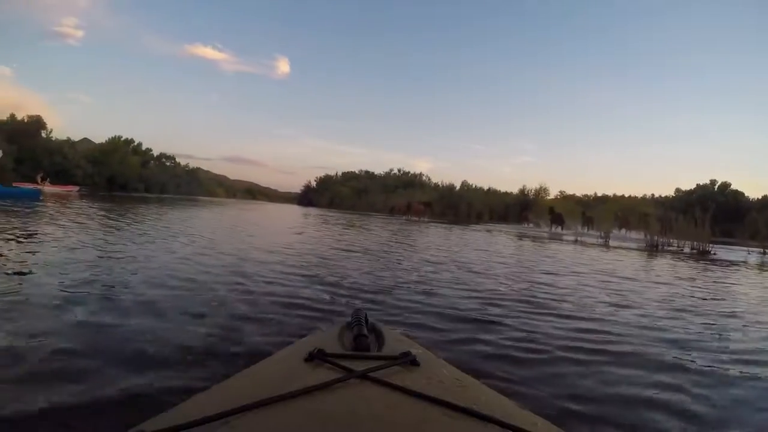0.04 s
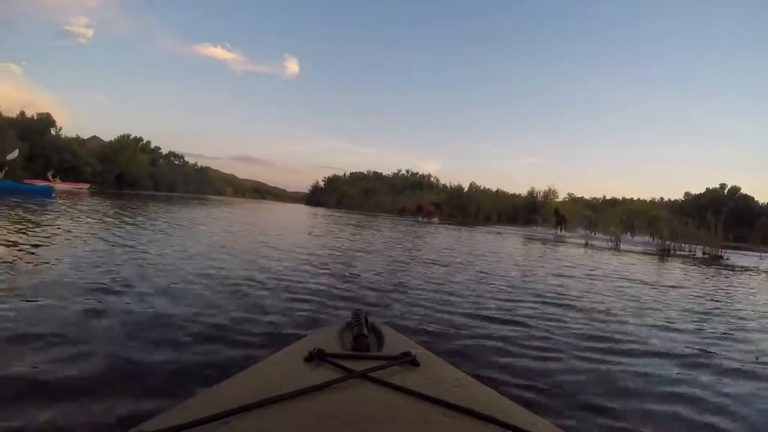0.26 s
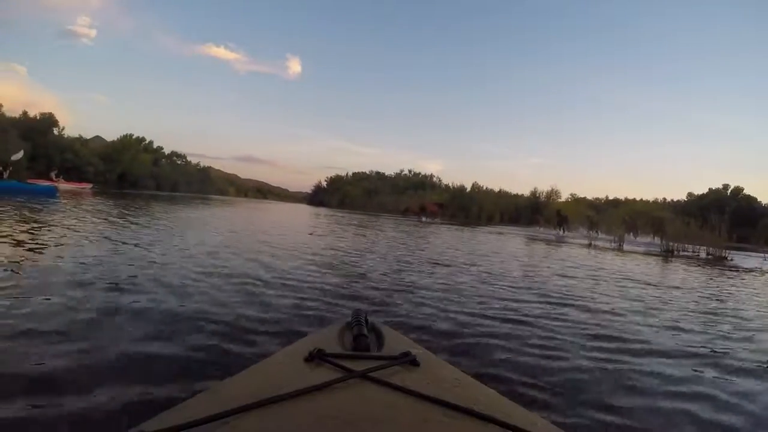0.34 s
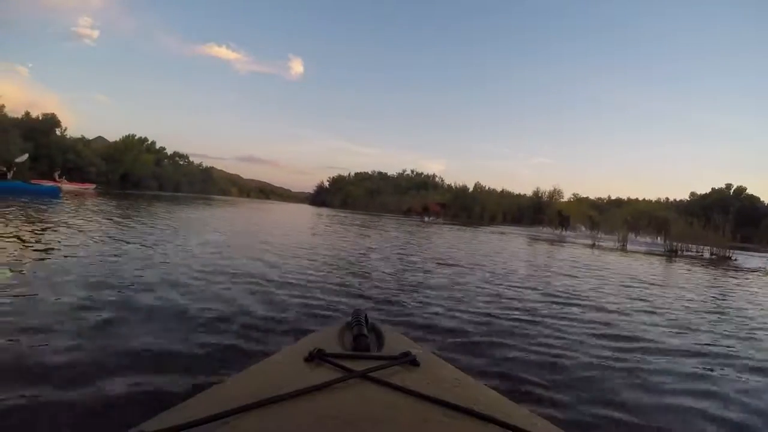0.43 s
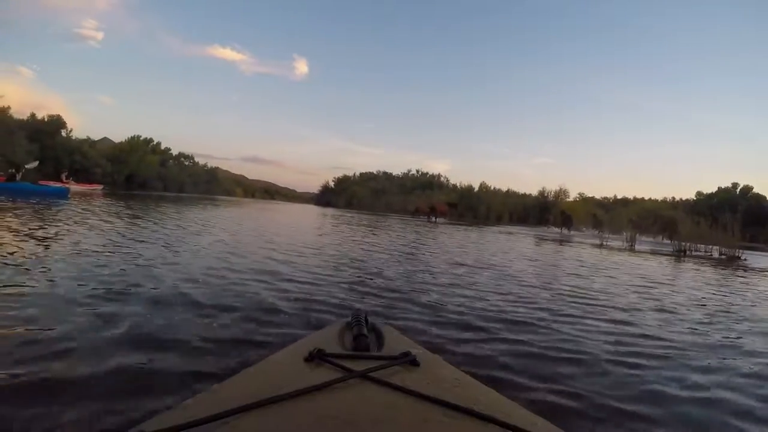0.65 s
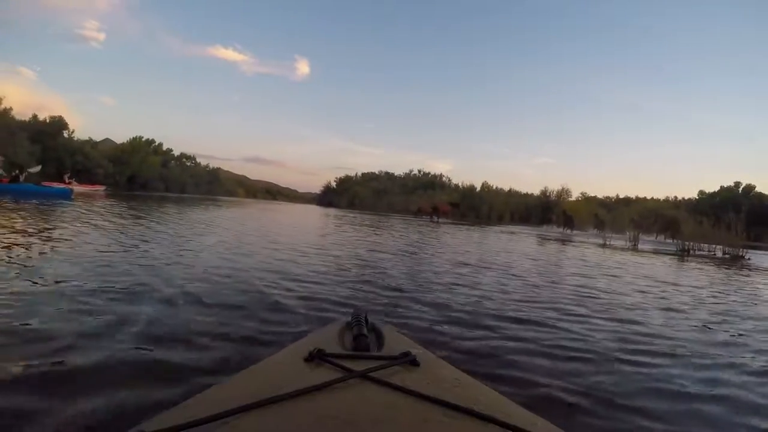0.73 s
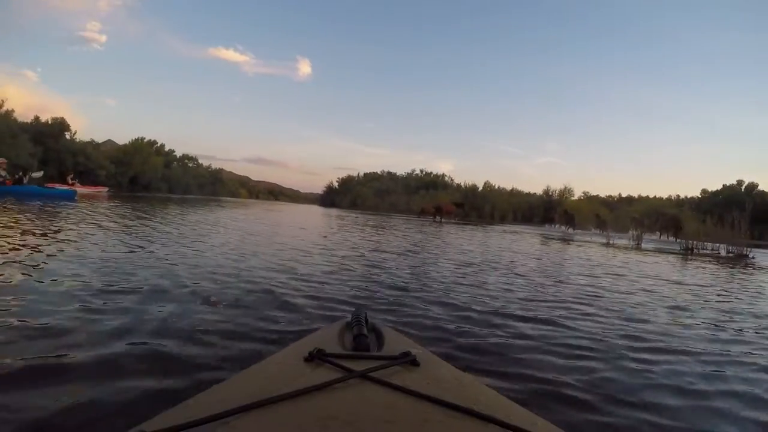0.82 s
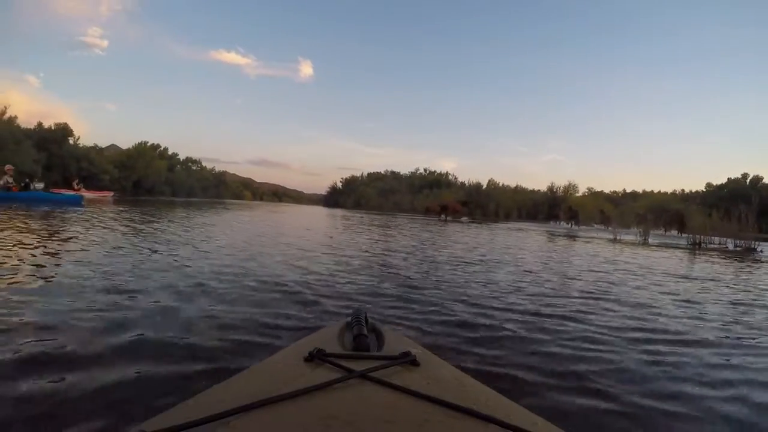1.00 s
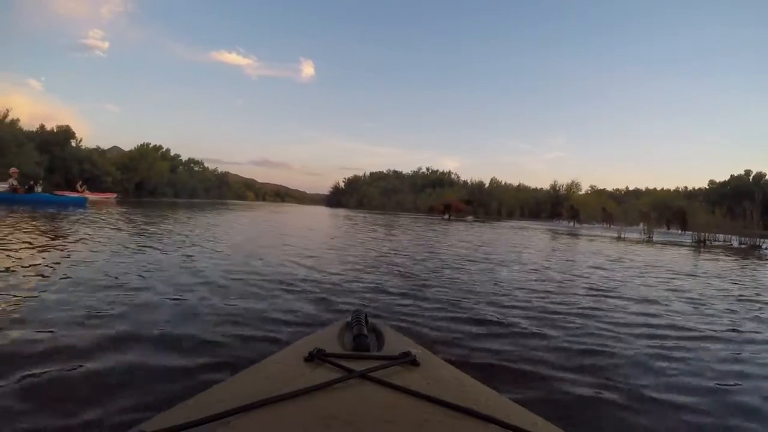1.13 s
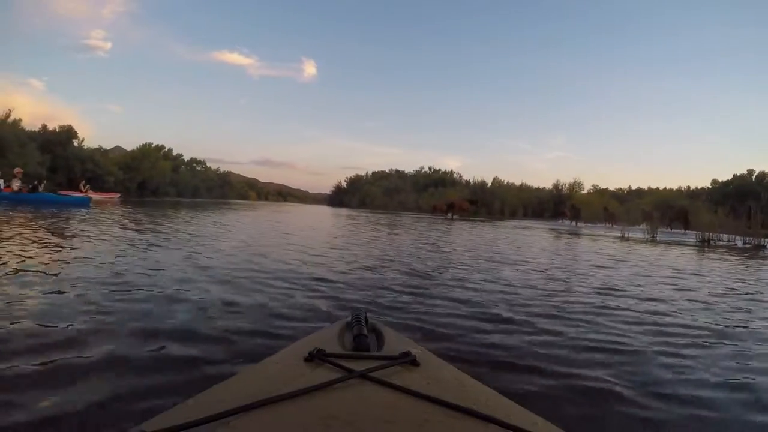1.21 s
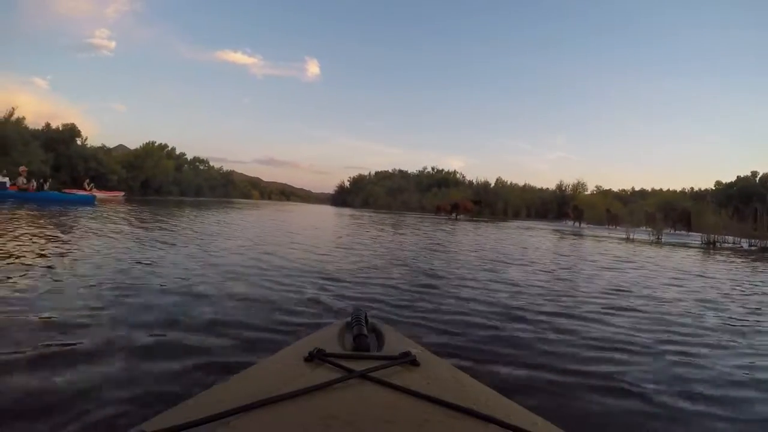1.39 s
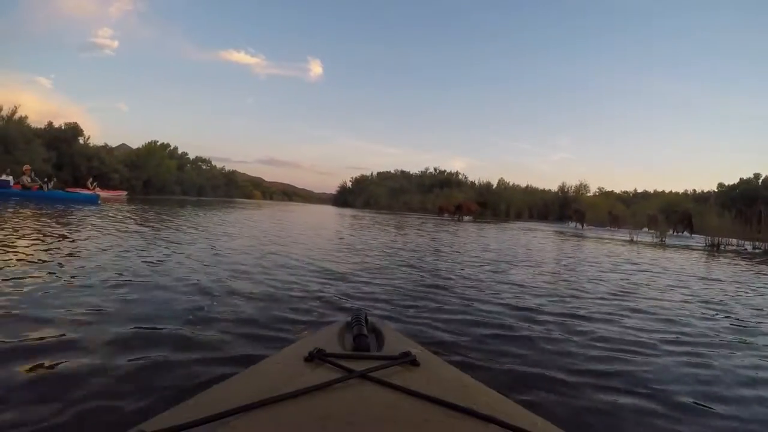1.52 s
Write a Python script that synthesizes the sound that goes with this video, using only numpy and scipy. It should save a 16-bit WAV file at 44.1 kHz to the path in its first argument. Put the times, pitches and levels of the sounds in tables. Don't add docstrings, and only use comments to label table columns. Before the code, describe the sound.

Hollow knocks on a plastic kayak hull, close and dry, over faint lapping water on a lake

```python
import sys
import numpy as np
from scipy import signal
from scipy.fft import rfft, irfft
from scipy.io import wavfile

SR = 44100
rng = np.random.default_rng(int(sys.argv[2]) if len(sys.argv) > 2 else 0)


def transcribe(u):
    v = np.clip(np.atleast_2d(u).T, -1, 1)
    q = np.round(v * 32767).astype(np.int16)
    wavfile.write(sys.argv[1], SR, q)


def voltage_ratio(level):
    return 10 ** (np.asarray(level, float) / 20)


N = 68355


def evened(x):
    return x / np.sqrt(np.mean(x ** 2) + 1e-20)


def read(points, hz):
    f, level_db = np.transpose(points)
    return np.interp(np.log(hz + 1), np.log(f + 1), level_db)


def curve(points):
    return voltage_ratio(np.interp(np.arange(N) / SR, *np.transpose(points)))


def add(mix, start, sound):
    part = mix[round(start * SR):][:len(sound)]
    part += sound[:len(part)]


def coloured(db_of, size):
    hz = np.fft.rfftfreq(size, 1 / SR)
    spectrum = rfft(rng.standard_normal(size)) * voltage_ratio(db_of(hz))
    return evened(irfft(spectrum, size))


def ring(hz, t60, t):
    return voltage_ratio(-60 * t / t60) * np.sin(2 * np.pi * hz * t)


def pushed(x, push_s):
    blow = np.hanning(round(push_s * SR) + 3)
    return signal.oaconvolve(x, blow / blow.sum())[:len(x)]


def lowpass(hz, corner_hz, slope_db):
    return -slope_db * np.log2(1 + (hz / corner_hz) ** 4) / 4


# f/Hz, level/dB per Hz
AIR_SPECTRUM = [(250, 0), (800, 0), (1600, -6), (2500, -6.5), (4500, -10.5), (6300, -13.5), (10800, -16),
                (12500, -22.5)]
# t/s, gain/dB
AIR_GAIN = [(0, 6), (.3, 6), (.5, 5), (.62, 6), (.9, 4.5), (1.55, 3)]
# f/Hz, width/Hz, level/dB
HOUSING_HUMPS = [(1260, 220, 5), (1740, 200, 8), (3335, 270, 5.5), (3853, 243, 7), (7150, 370, 6.5),
                 (9600, 900, 5)]


def air():
    def spectrum(f):
        humps = sum(db * np.exp(-((f - hz) / width) ** 2) for hz, width, db in HOUSING_HUMPS)
        return read(AIR_SPECTRUM, f) + humps + lowpass(200 / (f + 1), 0.61, 8.7)

    return voltage_ratio(-84.5) * curve(AIR_GAIN) * coloured(spectrum, N)


# f/Hz, level/dB per Hz
LAP_SPECTRUM = [(15, 1.5), (33, 4.5), (60, -4.5), (100, -4.5), (200, -17.5), (300, -36), (600, -44),
                (3000, -110)]
# t/s, gain/dB
LAP_GAIN = [(0, -14), (.19, -8.5), (.25, 9.5), (.6, 8), (.95, 4.5), (1.3, 2.5), (1.55, -7.5)]


def lapping():
    lumps = coloured(lambda f: lowpass(f, 12, 24), N)
    water = coloured(lambda f: read(LAP_SPECTRUM, f) + lowpass(12 / (f + 1), 1, 12), N)
    return voltage_ratio(-63) * voltage_ratio(3 * lumps) * curve(LAP_GAIN) * water


# f/Hz, level/dB
WHINE_TONES = [(5033, -97), (5572, -106), (7241, -105)]


def whine():
    t = np.arange(N) / SR
    return sum(voltage_ratio(db) * np.sin(2 * np.pi * hz * t) for hz, db in WHINE_TONES)


# t/s, level/dB, f/Hz, t60/s
TAP_NOTES = [
    (.040, -69, 760, .06),
    (.043, -70, 900, .05),
    (.872, -73, 1260, .042),
    (.942, -68, 1330, .04),
    (1.233, -63, 960, .036),
    (1.446, -59, 940, .035),
    (1.446, -62, 760, .035),
    (1.447, -69, 1280, .025),
    (1.448, -72, 2500, .02),
    (1.054, -56, 945, .06),
]


def tap(start, db, hz, t60):
    t = np.arange(4096) / SR
    note = ring(hz, t60, t) + .3 * ring(.93 * hz, t60, t)
    return start, voltage_ratio(db) * np.minimum(t / .003, 1) * note


# t/s, then bend, flex, side and drum level/dB
THUD_BLOWS = [(0.082, -78, -72.5, -68, -71), (.211, -68, -56, -51, -46), (0.229, -69, -41, -61, -78),
              (0.267, -64, -41, -69, -49), (0.297, -55, -51, -47, -55), (0.358, -64, -39.5, -46.5, -46),
              (.380, -42.5, -51, -61, -43.5), (0.442, -58, -63.5, -61.5, -76), (.540, -32, -32.5, -24, -32),
              (.572, -39, -41.5, -39, -32), (.616, -48, -38.5, -39, -34), (0.638, -41.5, -40, -28.5, -32.5),
              (.747, -46, -37.5, -33.5, -39.5), (.781, -50, -51, -65, -38), (.815, -53, -60.5, -67, -53),
              (0.888, -56.5, -67.5, -78, -68), (1.062, -51.5, -41, -37, -45.5),
              (1.164, -68.5, -69, -60, -85), (1.244, -55, -61.5, -74, -55.5), (1.356, -65, -78, -68, -60.5),
              (1.449, -51, -47.5, -49.5, -76), (1.487, -57, -65, -64, -82)]
# f/Hz, t60/s, partner f/Hz, partner level/dB, rise/s
HULL_MODES = [(62.6, 0.39, 76, -5.5, 0.0076), (96.45, 0.21, 108.2, -0.5, 0.0024),
              (149.7, 0.084, 170, -5, 0.0017), (184.85, 0.19, 311, -21, 0.0019)]


def thud(start, *levels_db):
    t = np.arange(22050) / SR
    modes = np.zeros(len(t))
    for db, (hz, t60, partner_hz, partner_db, rise_s) in zip(levels_db, HULL_MODES):
        pair = ring(hz, t60, t) + voltage_ratio(partner_db) * ring(partner_hz, 0.73 * t60, t)
        modes -= voltage_ratio(db) * (1 - 0.37 * np.exp(-t / rise_s)) * pair
    modes = signal.lfilter(*signal.butter(2, 49, "high", fs=SR), modes)
    wash = coloured(lambda f: lowpass(f, 248, 60) + lowpass(55 / (f + 1), 0.55, 54), len(t))
    wash *= voltage_ratio(levels_db[1] - 13 - 60 * t / .2) * np.minimum(t / .01, 1)
    push_s = .0065 if max(levels_db) < -45.5 else .0025
    return start, pushed(modes, push_s) + wash


# t/s, level/dB, f/Hz, t60/s
SKIN_SLAPS = [
    (1.4458, -41, 118, .05),
    (1.2505, -47, 140, .045),
    (1.350, -59, 190, .07),
    (1.361, -65, 270, .06),
    (1.325, -59, 160, .06),
    (.086, -58, 185, .13),
]


def slap(start, db, hz, t60):
    t = np.arange(8192) / SR
    return start, voltage_ratio(db) * pushed(ring(hz, t60, t), .7 / hz)


# t/s, level/dB
MOUNT_KICKS = [
    (0.087, -65.5),
    (0.268, -40),
    (0.549, -45.5),
    (0.671, -35.5),
    (0.782, -34.5),
    (0.951, -48.5),
    (1.072, -42),
    (1.331, -60.5),
    (1.487, -66),
]


def sway(start, db):
    t = np.arange(44100) / SR
    return start, voltage_ratio(db) * pushed(ring(30.95, 0.53, t), push_s=.02)


# t/s, level/dB, tilt/dB per octave, housing buzz/dB, favoured f/Hz
DECK_RAPS = [(.208, -55.5, -1, -12, 431.4), (.250, -59, 1, -29, 340), (.345, -58.5, 1, 9, 834),
             (.357, -61, 0, -12, 405), (.531, -35.5, 2, -1, 667), (.537, -37.5, -4, -3.5, 655),
             (.541, -36.5, -7, -23.5, 316.6), (0.543, -46, 1, 18, 1164), (.558, -47.5, 0.5, 13.5, 1033),
             (.568, -46, -2.5, 10.5, 1087), (.609, -40, -2.5, -5.5, 700), (0.617, -44, -4, -6.5, 470),
             (0.623, -41.5, -6, -0.5, 1035), (.638, -44, -4.5, -4, 325), (.644, -50.5, 0.5, -8.5, 662),
             (0.651, -50.5, -11, 1.5, 1000), (.738, -41, -0.5, -20, 994), (.744, -41, -6, 1.5, 687.5),
             (1.055, -65.5, -2.5, 0, 940), (1.060, -58.5, -14, -25, 287), (1.448, -72, 2.5, 4, 766)]
# f/Hz, level/dB, t60/s
DECK_MODES = [(312.5, -2.5, 0.085), (405, -14, 0.15), (449.7, -8, 0.13), (481.6, -10, 0.13),
              (558, -13, 0.077), (647.5, -5.5, 0.048), (691, -4, 0.099), (849, -0.5, 0.073),
              (1002, -2, 0.04), (1175, 1.5, 0.047), (1345, -4.5, 0.062), (1423, -8.5, 0.056),
              (1800, -20, .06), (2160, -32.5, .05)]
# f/Hz, level/dB per Hz
CRACK_SPECTRUM = [(250, -7), (700, -7.5), (1300, 0), (1900, -19), (3000, -21), (4200, -33), (9500, -45),
                  (12500, -72.5)]
# f/Hz, level/dB per Hz
RATTLE_SPECTRUM = [(150, -26), (300, -6), (700, 1), (1300, -8.5), (1800, -20.5), (3000, -23), (4500, -35.5),
                   (9000, -58)]


def rap(start, db, tilt_db, buzz_db, spot_hz):
    t = np.arange(8192) / SR

    def lean(f):
        near_spot = np.exp(-(np.log2((f + 1) / spot_hz) / .25) ** 2)
        return tilt_db * np.log2(f / 700 + 0.23) + 5 * near_spot

    modes = np.zeros(len(t))
    for hz, mode_db, t60 in DECK_MODES:
        scatter, detune, side = rng.standard_normal(3)
        level = voltage_ratio(mode_db + 2.5 * scatter + lean(hz)) * np.sign(side)
        modes += level * ring(hz * (1 + .012 * detune), t60, t) / 2
    crack = coloured(lambda f: read(CRACK_SPECTRUM, f) + lean(f), len(t))
    crack *= voltage_ratio(-2.5 - 60 * t / 0.016)
    rattle = coloured(lambda f: read(RATTLE_SPECTRUM, f) + lean(f), len(t))
    rattle *= voltage_ratio(-7 - 60 * t / 0.086)
    buzz_hz = 2493
    buzz = ring(buzz_hz, 0.031, t) + 0.77 * ring(1.035 * buzz_hz, 0.013, t)
    buzz *= voltage_ratio(-12.5 + buzz_db) * np.minimum(t / 0.0028, 1)
    spot = ring(spot_hz, .07, t)
    rise_s = .02 if start < .3 else .001
    return start, voltage_ratio(db) * np.minimum(t / rise_s, 1) * (modes + spot + crack + rattle + buzz)


# t/s, level/dB, f/Hz, t60/s
PANEL_RINGS = [(.357, -57.5, 408, .16), (.350, -60, 915, 0.11), (.349, -59, 810, 0.076),
               (.537, -43.5, 311.5, 0.15), (.743, -38.5, 694, 0.071), (.739, -42, 1000, 0.052),
               (.640, -46, 445, .11), (.532, -34.5, 650, .05), (.533, -40, 870, 0.044),
               (.532, -35, 1170, 0.056), (.545, -45, 1330, .07), (.622, -51.5, 1400, .08),
               (.615, -45, 1136, 0.082), (.612, -41.5, 650, .07), (.625, -47, 480, .12),
               (.643, -45.5, 650, .06), (.640, -48.5, 1020, .07), (.785, -60.5, 680, 0.072),
               (.748, -52, 497, 0.11)]


def panel(start, db, hz, t60):
    return tap(start, db, hz, t60)


# t/s, level/dB, f/Hz, t60/s, snap/dB
TOUCH_TICKS = [(.5298, -41.5, 970, .012, -26), (.5327, -25, 1002, 0.01, -21.5),
               (.5384, -30.5, 610, .005, -20.5), (.5355, -28.5, 143, .03, -60),
               (.6102, -31, 850, 0.0057, -35.5), (.6160, -31, 800, .006, -36),
               (.7415, -31.5, 97, 0.043, -53), (.7400, -38.5, 1340, 0.0076, -26),
               (1.0535, -52.5, 1390, 0.006, -19), (1.0564, -38, 270, .018, -50),
               (.758, -67, 2480, 0.044, -18)]
# f/Hz, level/dB, t60/s
SNAP_MODES = [(2620, 8.5, 0.0061), (4340, -3.5, 0.0036), (6240, -2.5, 0.0023), (9500, -9, 0.0024)]


def tick(start, db, hz, t60, snap_db):
    t = np.arange(8192) / SR
    body = pushed(ring(hz, t60, t), .3 / hz)
    snap = sum(voltage_ratio(mode_db) * ring(mode_hz, mode_t60, t) for mode_hz, mode_db, mode_t60 in SNAP_MODES)
    return start, voltage_ratio(db) * (body + voltage_ratio(snap_db) * pushed(snap, push_s=.00008))


def scene():
    mix = air() + lapping() + whine()
    played = ((tap, TAP_NOTES), (thud, THUD_BLOWS), (slap, SKIN_SLAPS), (sway, MOUNT_KICKS),
              (rap, DECK_RAPS), (panel, PANEL_RINGS), (tick, TOUCH_TICKS))
    for source, events in played:
        for event in events:
            add(mix, *source(*event))
    return mix[None]


def low_pass(x):
    return signal.sosfilt(signal.butter(12, 13900, fs=SR, output="sos"), x)


def record(dry):
    limit = .062
    mix = limit * np.tanh(dry / limit)
    return low_pass(mix)


dry = scene()
out = record(dry)
transcribe(out)
```